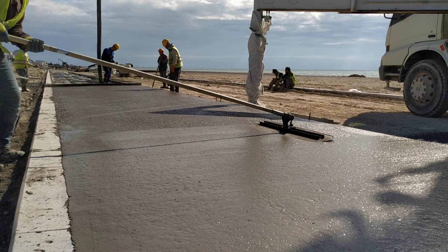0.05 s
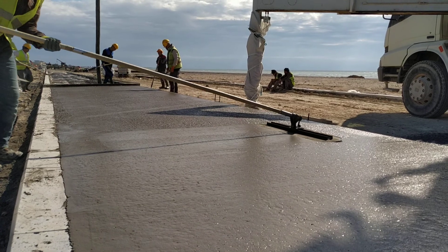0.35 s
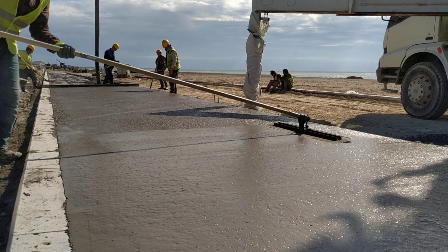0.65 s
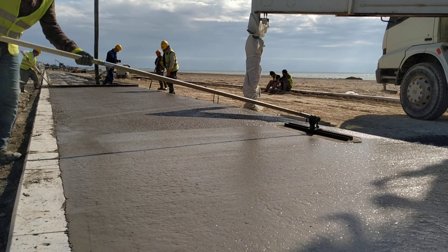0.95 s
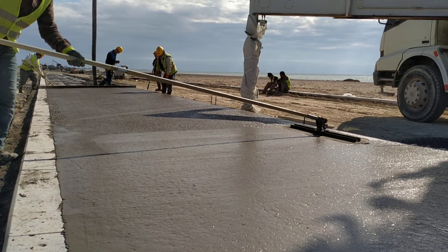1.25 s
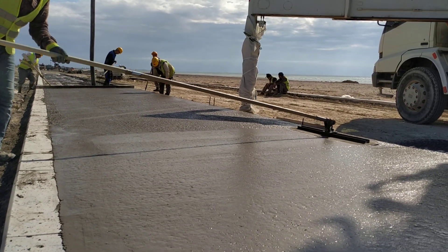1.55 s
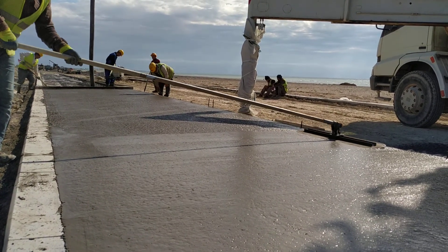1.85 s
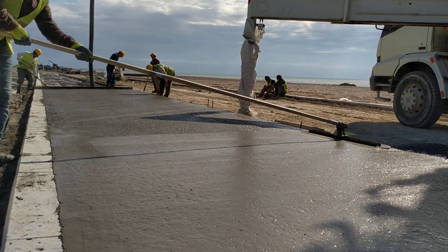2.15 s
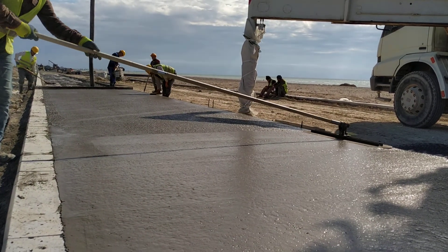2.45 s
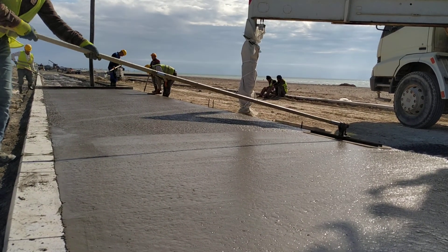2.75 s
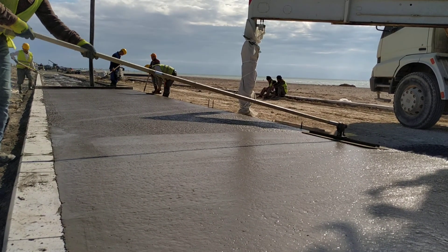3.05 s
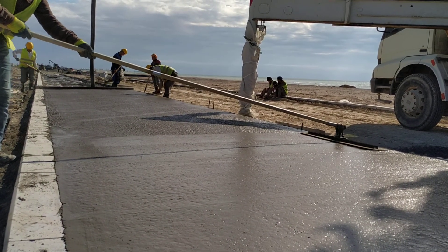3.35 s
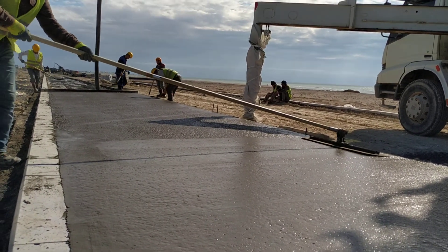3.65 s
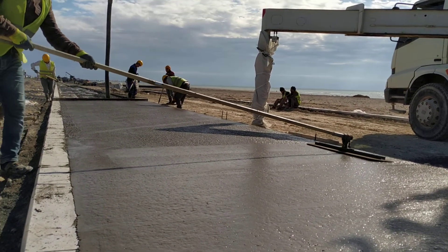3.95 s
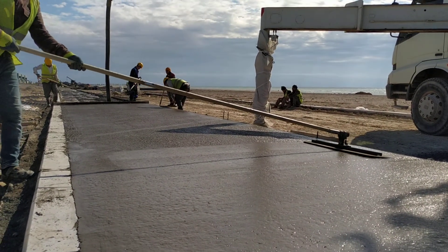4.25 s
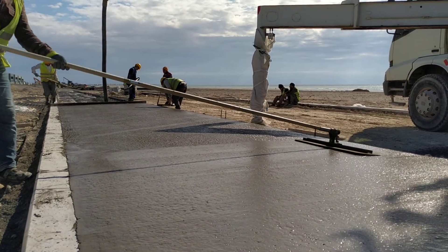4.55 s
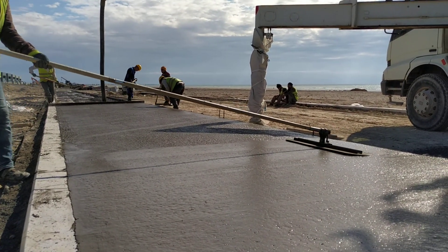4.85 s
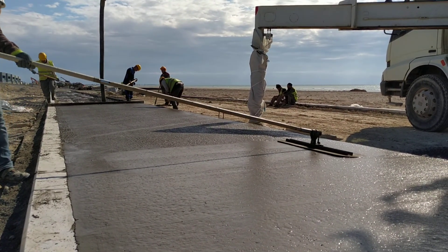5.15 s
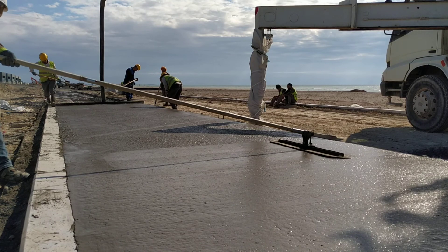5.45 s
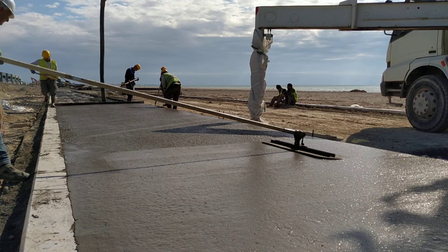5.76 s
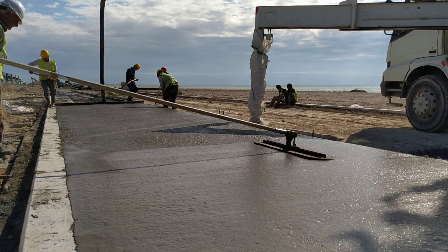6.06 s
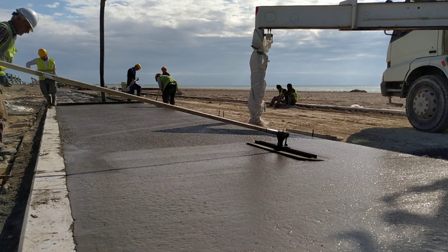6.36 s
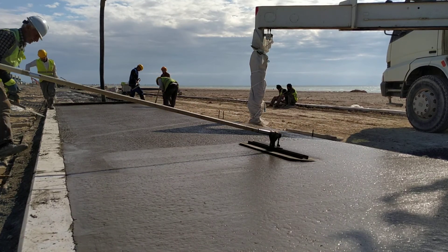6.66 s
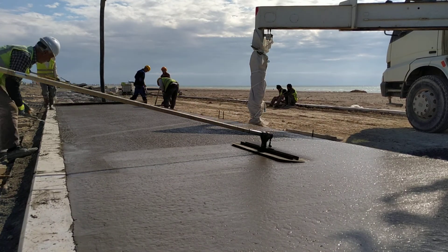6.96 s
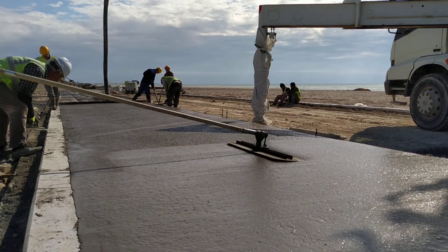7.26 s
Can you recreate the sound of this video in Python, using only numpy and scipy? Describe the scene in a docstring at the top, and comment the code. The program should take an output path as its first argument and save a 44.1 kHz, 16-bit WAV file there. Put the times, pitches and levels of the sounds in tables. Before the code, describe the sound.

Steady low diesel idling and clatter outdoors, with gusts thumping the microphone and a soft, gritty hiss of concrete being smoothed.

```python
"""A concrete pump truck's six-cylinder diesel idles at 800 rpm on an open building site: firings shake
the block, two throbs a cycle ring the panels, injection ticks over a steady hum.
Nearby a long-handled float slides over wet concrete, hissing and catching on grit.
Gusts buffet the two microphone ports in turn; the left port is half covered at first and rings lower
until it comes free with a click."""
import sys
import numpy as np
from scipy import signal
from scipy.fft import rfft, irfft
from scipy.io import wavfile
from scipy.ndimage import uniform_filter1d

SR = 44100
rng = np.random.default_rng(int(sys.argv[2]) if len(sys.argv) > 2 else 0)


def pcm_store(signal):
    """Save signal as 16-bit PCM."""
    levels = np.round(np.clip(np.atleast_2d(signal), -1, 1) * 32767)
    wavfile.write(sys.argv[1], SR, levels.astype(np.int16).T)


N = 330750
T = np.arange(N) / SR
BIN_HZ = np.arange(N // 2 + 1) * SR / N
CYCLE_HZ = 6.6665  # one engine cycle = two revolutions
UNCOVER_S = 1.597


def from_db(db):
    """Decibels to gain."""
    return 10 ** (np.asarray(db) / 20)


def rms_one(x):
    """Scale to unit rms."""
    return x / np.sqrt(np.mean(x ** 2) + 1e-20)


def by_hz(points):
    """Table interpolated over log frequency at every bin."""
    hz, value = np.transpose(points)
    return np.interp(np.log(BIN_HZ + 1e-3), np.log(hz), value)


def coloured(x, points):
    """Shape unit white noise to a density in dB per Hz."""
    return irfft(rfft(x) * from_db(by_hz(points)) * np.sqrt(SR / 2), N)


def drift(rate_hz):
    """Smooth random curve, unit rms."""
    pole = np.exp(-80 * np.pi * rate_hz / SR)
    slow = signal.lfilter([1], [1, -2 * pole, pole * pole], rng.standard_normal(N // 40 + 2002))[2000:]
    return np.interp(np.arange(N) / 40, np.arange(len(slow)), rms_one(slow))


def resonate(x, hz, width_hz):
    """Two-pole resonance, unit peak gain."""
    r = np.exp(-np.pi * width_hz / SR)
    feedback = [1, -2 * r * np.cos(2 * np.pi * hz / SR), r * r]
    return signal.lfilter(np.array([1, 0, -1]) * (1 - r * r) / 2, feedback, x)


def noise_band(hz, width_hz):
    """Resonant noise, unit rms."""
    return rms_one(resonate(rng.standard_normal(N), hz, width_hz))


def burst(peak_s, decay_s, swell_s=0.00013):
    """Exponential swell to 1, then decay."""
    return np.exp(-np.minimum(np.where(T < peak_s, (peak_s - T) / swell_s, (T - peak_s) / decay_s), 30))


def chug(crank, uneven_db=2.3, soften_hz=36):
    """Two throbs a cycle ring the panels; a second resonance softens each onset."""
    # (place [cycles], level [dB])
    throbs = [(.07, 0), (.57, 0)]
    # panel modes: (frequency [Hz], width [Hz], rms [dB])
    panels = [(560.6, 14, -58.5), (747, 6.5, -50.5), (882, 10, -55), (1015, 9.8, -55)]
    cycles, blows = np.arange(-1, int(crank[-1]) + 2), np.zeros(N)
    for place, db in throbs:
        at = np.searchsorted(crank, cycles + place)
        at = at[(at > 0) & (at < N)]
        blows[at] += from_db(db + uneven_db * rng.standard_normal(len(at)))
    return sum(from_db(db) * rms_one(resonate(resonate(blows + 1e-18, hz, width_hz), hz, soften_hz))
               for hz, width_hz, db in panels)


def knocks(crank, uneven_db=1.0, jitter_cycles=0.0065):
    """Pitched knocks recur each cycle, uneven in strength and timing."""
    # (place [cycles], pitch [Hz], peak [dB], half length [s])
    cycle_knocks = [(.06, 775, -40.5, .004), (.14, 590, -37.5, .006), (.57, 925, -44, .004),
                    (.61, 618, -34, .0058)]
    out = 0
    for place, hz, db, half_s in cycle_knocks:
        cycle, turn = np.divmod(crank - place + 1.5, 1)
        force, late = rng.standard_normal((int(crank[-1]) + 4, 2))[cycle.astype(int)].T
        age_s = (turn - .5) / CYCLE_HZ
        swell = np.exp(-((age_s - jitter_cycles * late / CYCLE_HZ) / half_s) ** 2 / 2)
        out += from_db(db + uneven_db * force) * swell * np.sin(2 * np.pi * (hz * age_s + rng.random()))
    return out


def clatter(crank, lead_s, rise_cycles=.055, fall_cycles=0.19, uneven_db=.5, ripple_db=1.3):
    """Firings shake the block: the lows largely repeat each cycle, the highs are mostly new."""
    # firings: (place [cycles], level [dB])
    cylinders = [(.005, 16), (.16, -2.5), (.33, 10), (0.494, 15.5), (.66, 2.5), (.82, 9)]
    # block and exhaust: (frequency [Hz], density [dB per Hz])
    spectrum = [(25, -72), (50, -62), (90, -65), (150, -59.5), (300, -61.5), (440, -65), (520, -71.5),
                (620, -67.5), (700, -68.5), (820, -70.5), (950, -68.5), (1200, -74.5), (1350, -70.5),
                (2200, -73), (4200, -77), (5200, -83), (7700, -79.5), (14000, -91.5)]
    # power repeating each cycle: (frequency [Hz], share [0-1])
    repeating = [(100, 0.98), (300, 0.59), (600, 0.89), (1000, 0.46), (1800, 0.03), (3500, 0.32)]
    # power arriving straight from the truck: (frequency [Hz], share [0-1])
    direct_share = [(100, 0.97), (600, 1), (1600, 0.52), (2400, 0.73), (3500, 0.13), (6000, 0.92),
                    (9000, 0.23)]
    power = 0.86  # steady rattle between firings
    for place, knock_db in cylinders:
        cycle, age = np.divmod(crank - place + 1, 1)
        strength = from_db(knock_db + uneven_db * rng.standard_normal(int(crank[-1]) + 4))
        onset = 1 - np.exp(-(age / rise_cycles) ** 2)
        power += strength[cycle.astype(int)] ** 2 * onset * np.exp(-age / fall_cycles)
    period = round(SR / CYCLE_HZ)
    looped = np.array([np.interp(crank % 1 * period, np.arange(period), row)
                       for row in rng.standard_normal((3, period))])
    fresh = rng.standard_normal((3, N))
    same, direct = by_hz(repeating), by_hz(direct_share)
    straight, *scattered = np.sqrt(same) * rfft(looped) + np.sqrt(1 - same) * rfft(fresh)
    right_lag = np.exp(-2j * np.pi * BIN_HZ * np.array([[0], [lead_s]]))
    field = np.sqrt(direct) * straight * right_lag + np.sqrt(1 - direct) * np.array(scattered)
    # close block resonances ripple the spectrum above 1 kHz
    ripple = from_db(ripple_db * by_hz([(900, 0), (1200, 1)]) * drift(40)[:len(BIN_HZ)])
    return coloured(irfft(field * ripple, N) * rms_one(np.sqrt(power)), spectrum)


def ticks(crank, per_cycle=3, first_cycles=.235, half_s=.003):
    """Injection ticks: a bright snap, then a lower ring."""
    # (frequency [Hz], width [Hz], rms [dB], lag [cycles])
    rings = [(3240, 270, -60, 0.014), (5900, 630, -57.5, 0), (9490, 370, -57, 0.0017),
             (4130, 150, -53, 0.038)]
    out = 0
    for hz, width_hz, db, lag in rings:
        age_s = ((per_cycle * (crank - first_cycles - lag) + .5) % 1 - .5) / (per_cycle * CYCLE_HZ)
        snaps = np.exp(-(age_s / half_s) ** 2) * rng.standard_normal((2, N))
        out += from_db(db) * rms_one(resonate(snaps, hz, width_hz))
    return out


def truck(wobble_cycles=0.00588, waver_db=0.2, hum_hz=114.86, hum_db=-32.5, hum_waver_db=.7, lead_s=0.0002):
    """Idling diesel with hum and whines; direct sound reaches the left port first."""
    # engine tones: (multiple of the cycle rate, rms [dB])
    orders = [(3, -52), (5, -31), (6, -24.5), (12, -37), (18, -36.5), (38, -46), (40, -47), (60, -50),
              (70, -53.5), (72, -55), (82, -55.5), (84, -48)]
    # machinery whines: (frequency [Hz], width [Hz], rms [dB])
    whine_bands = [(4397, 18, -57), (5870, 180, -53), (6380, 180, -52)]
    crank = CYCLE_HZ * T + wobble_cycles * drift(0.619)  # cycles elapsed
    tones = sum(from_db(db + waver_db * drift(0.64)) * np.sin(2 * np.pi * (order * crank + rng.random()))
                for order, db in orders)
    hum_gain = from_db(hum_db + hum_waver_db * drift(4.5))
    hum = hum_gain * np.sin(2 * np.pi * (hum_hz * T + 0.14 * drift(0.75)))
    whines = sum(from_db(db) * noise_band(hz, width_hz) for hz, width_hz, db in whine_bands)
    drone = np.sqrt(2) * (tones + hum) + chug(crank) + knocks(crank) + whines
    return clatter(crank, lead_s) + ticks(crank) + np.array([drone, np.interp(T - lead_s, T, drone)])


def concrete_float(grain_db=2.0, pan_db=1.0, sand_per_s=45, sand_db=-3, sand_decay_s=0.00086):
    """The blade hisses on wet sand, crackles over fine grains and catches stones."""
    # hiss over the strokes: (time [s], level [dB])
    stroke = [(0, -7), (1.15, -2), (1.5, -4.5), (1.95, -9.5), (3.1, -13.5), (3.52, -10), (3.78, -10.5),
              (4.5, -9.5), (4.65, -12.5), (5.3, -10.5), (6.2, -16), (6.75, -8.5), (7.5, -13)]
    # (frequency [Hz], level [dB])
    hiss_colour = [(500, -72), (1500, -80.5), (3500, -78.5), (5500, -71.5), (7700, -71), (10500, -80),
                   (14000, -86)]
    # (frequency [Hz], level [dB])
    grit_colour = [(1000, 14), (3500, 18.5), (5500, 14), (8000, 10.5), (11000, 14.5), (14000, 3)]
    slide = from_db(np.interp(T, *np.transpose(stroke)) + grain_db * drift(57))
    grains = (rng.random(N) < sand_per_s / SR) * np.minimum(rng.exponential(1, N), 3)
    crackle = signal.lfilter([1], [1, -np.exp(-1 / (sand_decay_s * SR))], grains + 1e-18)
    hiss = coloured(slide * rng.standard_normal((2, N)), hiss_colour)
    rasp = rms_one(coloured(rng.standard_normal((2, N)), grit_colour))
    sand = from_db(sand_db) * hiss.std() * np.sqrt(slide) * crackle * rasp
    return (hiss + sand + stones(rasp)) * from_db([[pan_db / 2], [-pan_db / 2]])


def cavity(x, modes):
    """The cavity before a microphone adds its resonances."""
    return x + sum(from_db(db) * resonate(x, hz, width_hz) for hz, width_hz, db in modes)


def ports(left, right, covered_db=-1.0, open_db=-2.0, changeover_s=0.0078):
    """Both ports colour the sound; the left rings higher once free."""
    # cavity modes, each: (frequency [Hz], width [Hz], gain [dB])
    covered_modes = [(6000, 240, 6.5), (6600, 950, 12.5), (13600, 3300, 8)]
    open_modes = [(9140, 390, 10.5), (9550, 320, 10.5), (12600, 1100, -1.5)]
    right_modes = [(7550, 650, 0.34)]
    free = (1 + np.tanh((T - UNCOVER_S) / changeover_s - 1)) / 2
    covered = from_db(covered_db) * cavity(left, covered_modes)
    opened = from_db(open_db) * cavity(left, open_modes)
    return (1 - free) * covered + free * opened, cavity(right, right_modes)


def wind(gustiness_db=1.2, split_hz=130, gust_ref_db=-18, heave_db=-3, flutter_db=-2.5):
    """Separate turbulence at each port: slow heave and lumpy flutter, both growing with the gust."""
    # (time [s], left level [dB], right level [dB])
    gusts = [(0, -23.5, -24.5), (.7, -25, -42), (1.55, -23.5, -30), (1.78, -20.5, -28), (2.14, -22, -16.5),
             (2.7, -25.5, -31.5), (3.05, -19, -25.5), (3.47, -25.5, -23.5), (3.74, -17, -29),
             (4.08, -19.5, -34), (4.45, -19.5, -29), (5, -17.5, -27.5), (5.4, -21, -22.5),
             (5.7, -22.5, -18), (6.15, -22.5, -19.5), (6.64, -22, -30), (6.85, -17.5, -22),
             (7.15, -18, -33), (7.5, -17, -23)]
    # (frequency [Hz], level [dB])
    rumble = [(12, -8), (25, -6.5), (50, -13.5), (80, -19), (150, -24.5), (300, -37.5), (600, -50),
              (1200, -65.5), (2400, -76)]
    times_s, *courses_db = np.transpose(gusts)
    low_pass, out = signal.butter(2, split_hz, fs=SR, output="sos"), []
    for course_db in courses_db:
        gust_db = np.interp(T, times_s, course_db) + gustiness_db * drift(3)
        excess_db = gust_db - gust_ref_db
        pressure = coloured(rng.standard_normal(N), rumble)
        lows = signal.sosfiltfilt(low_pass, pressure, padtype="even")
        eddies = np.tanh(drift(26))
        flutter = (pressure - lows) * rms_one(from_db(8 * eddies)) * from_db(flutter_db + 0.28 * excess_db)
        heave = lows * rms_one(from_db(3 * eddies)) * from_db(heave_db + 0.14 * excess_db)
        out.append(from_db(gust_db) * (heave + flutter))
    return np.array(out)


def buffets(extra_fade_s=0.0044, ref_swell_s=0.00513, deepening=0.114):
    """Strong eddies knock dully on one port; larger ones fade more slowly and sound deeper."""
    # (time [s], level [dB], swell [s], port [L/R])
    eddies = [(1.055, -19, 0.01, "L"), (1.639, -7.5, .01, "L"), (1.713, -17, 0.017, "L"),
              (2.031, -19.5, 0.0196, "L"), (2.204, -17, 0.025, "R"), (3.009, -21.5, 0.0075, "R"),
              (3.404, -18, 0.0068, "R"), (3.566, -9.5, .005, "L"), (3.643, -14.5, 0.011, "L"),
              (3.707, -8.5, 0.0043, "L"), (3.8, -19, .004, "L"), (3.888, -13.5, 0.021, "L"),
              (3.975, -14, 0.0066, "L"), (4.13, -22, 0.0057, "L"), (4.208, -13.5, 0.0055, "L"),
              (4.318, -14.5, 0.0083, "L"), (4.446, -20, 0.0031, "L"), (4.59, -13, .012, "L"),
              (4.622, -12, .022, "L"), (4.755, -13.5, 0.0073, "L"), (5.006, -9.5, 0.024, "L"),
              (5.471, -11, 0.0046, "L"), (5.62, -14.5, 0.0072, "R"), (5.82, -15, .003, "R"),
              (5.936, -15.5, .012, "R"), (6.034, -17, 0.0087, "R"), (6.182, -18, 0.0067, "R"),
              (6.235, -19.5, 0.02, "R"), (6.751, -11.5, 0.0021, "L"), (6.98, -10.5, 0.0032, "L"),
              (7.061, -18, 0.0063, "L"), (7.229, -12.5, 0.0074, "L"), (7.319, -19, 0.0044, "L"),
              (7.419, -16, 0.0056, "L")]
    # (frequency [Hz], level [dB])
    colour = [(30, -20), (90, 3.5), (160, 4.5), (250, -3), (450, -11.5), (800, -23), (1400, -34.5),
              (3000, -47.5)]
    turbulence = rms_one(coloured(rng.standard_normal(N), colour))
    turbulence /= np.sqrt(uniform_filter1d(turbulence ** 2, size=400) + .05)  # even within an eddy
    out = np.zeros((2, N))
    for at_s, db, swell_s, side in eddies:
        push = from_db(db) * burst(at_s, extra_fade_s + swell_s, swell_s)
        speed = (ref_swell_s / swell_s) ** deepening
        out["LR".index(side)] += push * np.interp(at_s + (T - at_s) * speed, T, turbulence)
    return out


def stones(rasp, bite_share=.35, ring_db=12, ring_width_hz=1700, judder_db=7, judder_hz=220):
    """Stones dragged under the blade bite, ring and judder."""
    # (time [s], level [dB], decay [s], pitch [Hz])
    grit = [(1.236, -20, .005, 8500), (2.253, -34, .004, 8200), (2.313, -27, .0025, 10500),
            (2.483, -25, .0035, 5900), (2.566, -31, .004, 7000), (2.585, -31.5, .024, 8200),
            (2.652, -40, .012, 11500), (3.33, -41, .025, 8500), (3.4, -41, .03, 8000),
            (3.525, -37.5, .035, 10000), (3.551, -29.5, .003, 7600), (3.566, -29, .0015, 6500),
            (4.346, -24, .003, 9000), (4.362, -33.5, .03, 7900), (4.435, -34, .03, 7900),
            (4.497, -33.5, .03, 8400), (4.549, -35, .01, 8500), (5.186, -31, .004, 4200),
            (5.19, -35, .014, 6000)]
    out = 0
    for at_s, db, decay_s, hz in grit:
        ringing = rms_one(rasp + from_db(ring_db) * resonate(rasp, hz, ring_width_hz))
        out += from_db(db) * burst(at_s, decay_s, bite_share * decay_s) * ringing
    return out * rms_one(from_db(judder_db * np.tanh(drift(judder_hz))))


def uncovering(rub_db=-27, hiss_db=-33):
    """The left port comes free: a rub, a dry click, then a lingering bright hiss."""
    # microphone housing: (frequency [Hz], decay [s], level [dB])
    click_modes = [(1500, .0006, -9.5), (2400, .0007, -6.5), (3300, .0006, -9), (7500, .0002, -13)]
    rub = from_db(rub_db) * burst(UNCOVER_S, decay_s=0.014, swell_s=0.044) * noise_band(8000, 4000)
    hiss = from_db(hiss_db) * burst(UNCOVER_S, decay_s=0.27) * noise_band(8900, 1700)
    age_s, click = np.maximum(T - UNCOVER_S, 0), 0
    for k, (hz, decay_s, db) in enumerate(click_modes):
        fade = np.exp(-np.minimum(age_s / decay_s, 30))
        click += (-1) ** k * from_db(db) * fade * np.sin(2 * np.pi * hz * age_s)
    return rub + hiss + click


def port_pops(gain_db=1.0):
    """One eddy, one push and pull of pressure: small ones pop, large ones thud."""
    # (time [s], level [dB], pitch [Hz], port [L/R])
    pops = [(1.621, -11, 270, "L"), (1.633, -9, 350, "L"), (1.643, -9.5, 260, "L"), (2.05, -9.5, 60, "L"),
            (2.157, -7.5, 55, "R"), (3.565, -9, 280, "L"), (3.708, -7.5, 280, "L"), (3.717, -11, 65, "L"),
            (3.83, -10, 45, "L"), (3.914, -14, 240, "L"), (3.925, -7.5, 60, "L"), (4.1255, -13, 360, "L"),
            (4.211, -7.5, 60, "L"), (4.322, -7, 50, "L"), (4.439, -10, 65, "L"), (4.666, -7.5, 45, "L"),
            (4.756, -14, 240, "L"), (4.94, -6.5, 65, "R"), (4.993, -13, 300, "L"), (5.001, -8, 60, "L"),
            (5.135, -8.5, 50, "L"), (5.374, -8, 55, "L"), (5.375, -16, 370, "L"), (5.461, -8, 50, "L"),
            (5.476, -10, 470, "L"), (5.594, -6, 50, "R"), (5.829, -9, 50, "R"), (6.399, -10, 55, "R"),
            (6.749, -10.5, 60, "L"), (6.975, -6, 280, "L"), (7.074, -4, 50, "L"), (7.222, -15, 360, "L"),
            (7.341, -8.5, 50, "L"), (7.438, -15, 240, "L")]
    out = np.zeros((2, N))
    for at_s, db, hz, side in pops:
        phase = 2 * np.pi * hz * (T - at_s)
        pulse = phase * np.exp(-np.minimum(phase ** 2 - 1, 100) / 2)
        out["LR".index(side)] += rng.choice([-1, 1]) * from_db(db + gain_db) * pulse
    return out


def scene():
    """Truck and float pass through the ports; wind acts directly on them."""
    left, right = ports(*(truck() + concrete_float()))
    return np.array([left + uncovering(), right]) + wind() + buffets() + port_pops()


def record(dry, low_cut_hz=14, high_cut_hz=14300):
    """Low cut, soft clip, steep high cut."""
    x = signal.sosfilt(signal.butter(2, low_cut_hz, "high", fs=SR, output="sos"), dry)
    x = x / (1 + x ** 6) ** (1 / 6)
    return signal.sosfilt(signal.ellip(12, .2, 90, high_cut_hz, fs=SR, output="sos"), x)


dry = scene()
out = record(dry)
pcm_store(out)
```